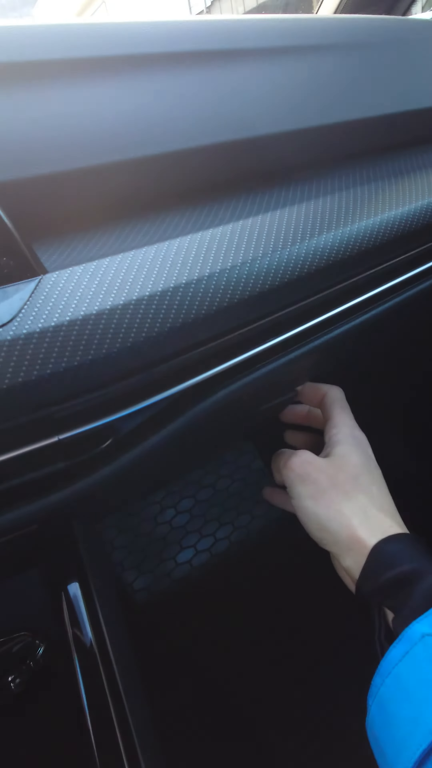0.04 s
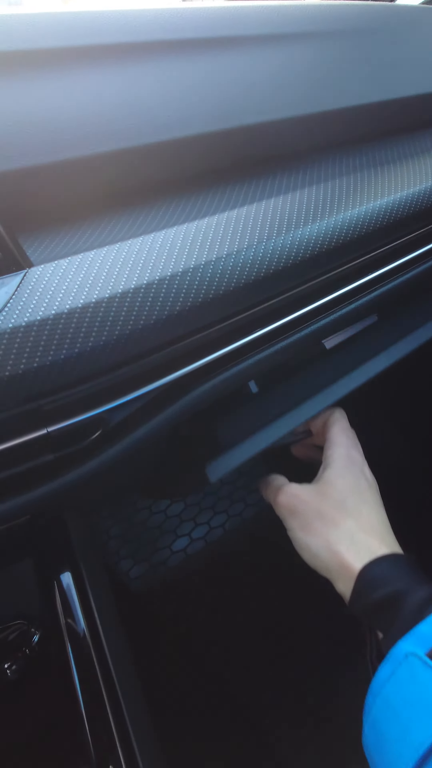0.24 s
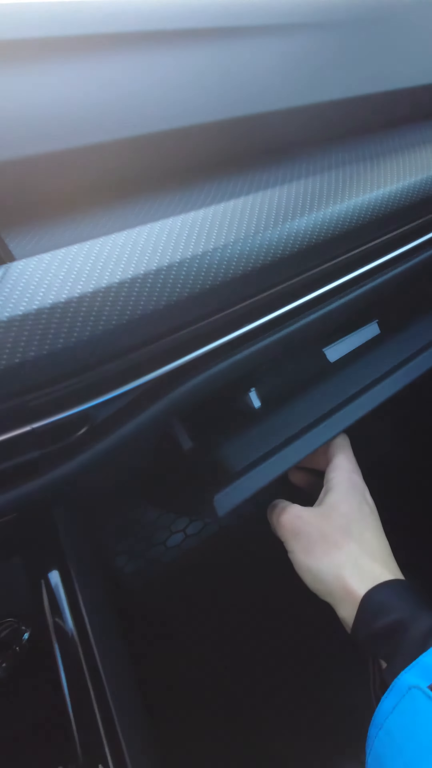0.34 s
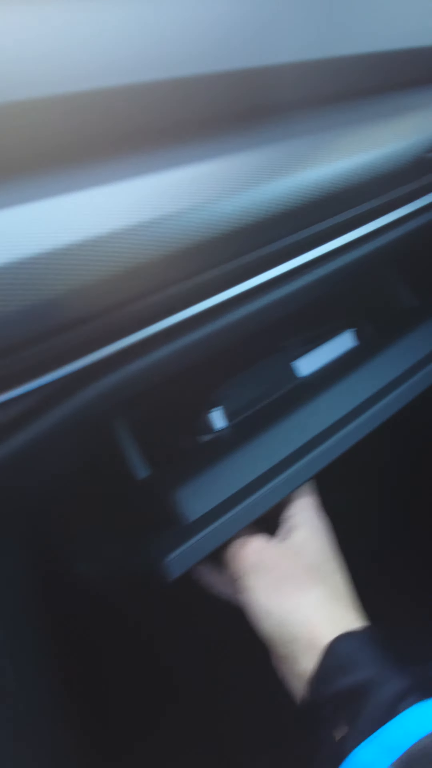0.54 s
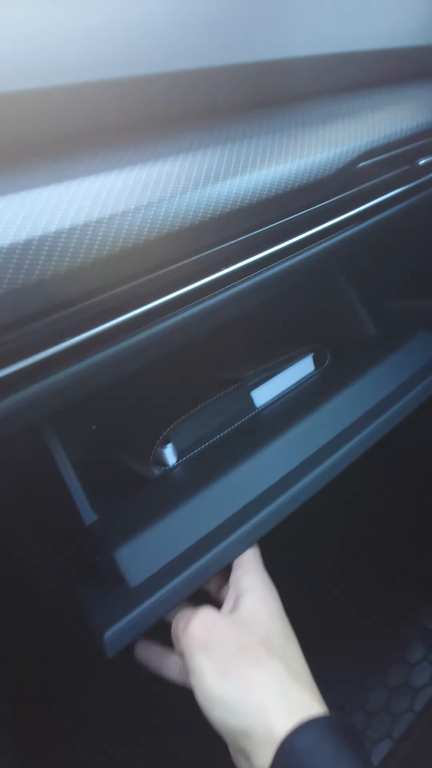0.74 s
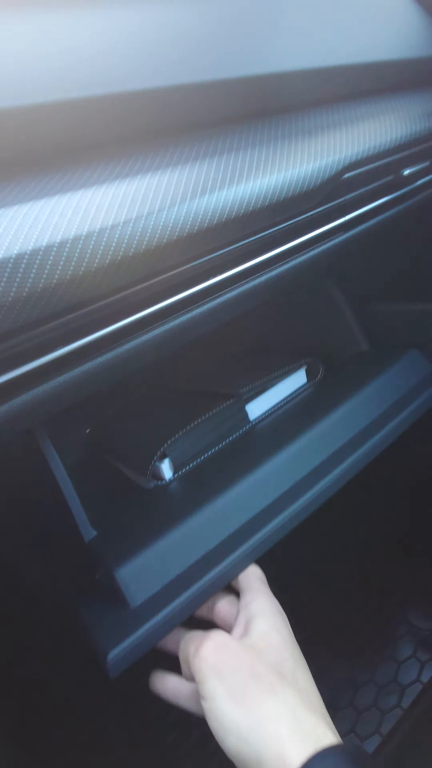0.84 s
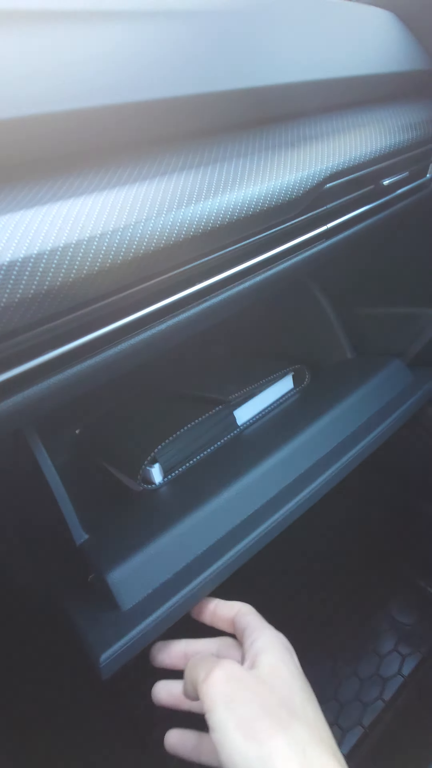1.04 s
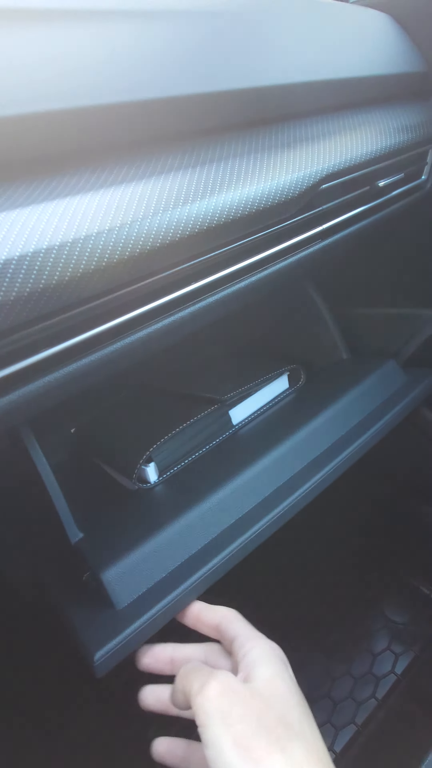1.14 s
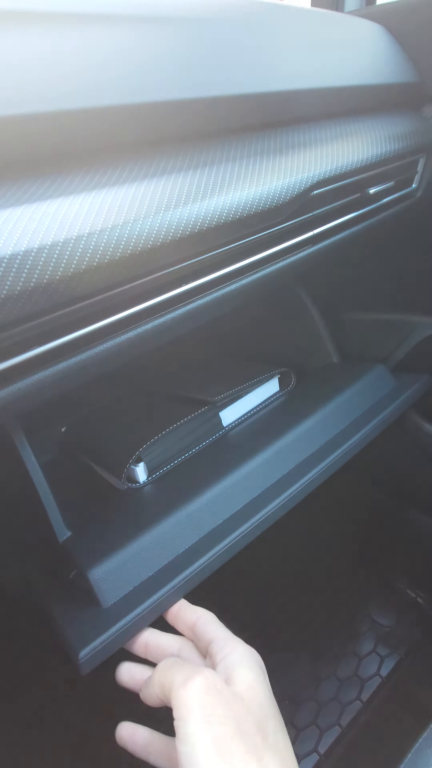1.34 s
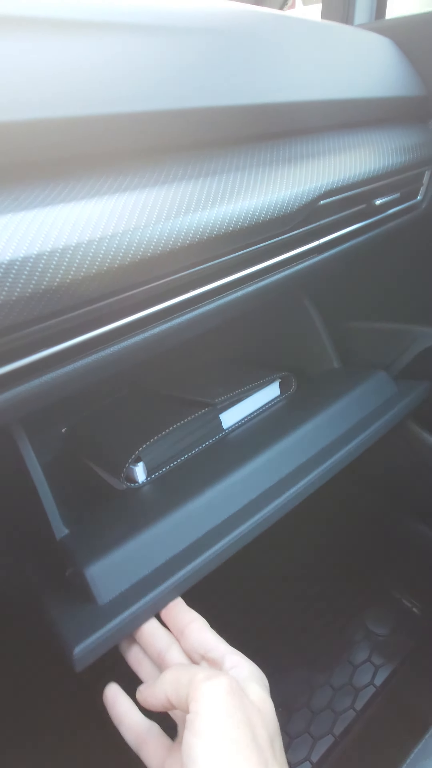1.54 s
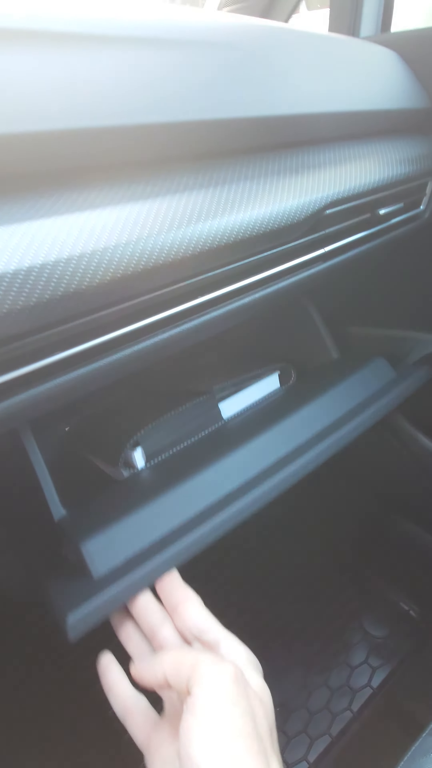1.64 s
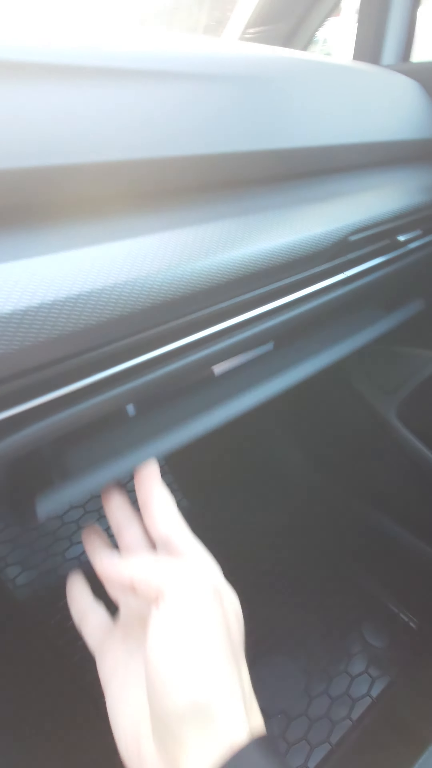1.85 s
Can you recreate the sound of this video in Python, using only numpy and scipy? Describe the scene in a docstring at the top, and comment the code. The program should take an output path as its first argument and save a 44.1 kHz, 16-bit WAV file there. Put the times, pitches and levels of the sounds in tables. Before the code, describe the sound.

A glovebox opens with a sharp plastic latch click and a low thump, close up inside a parked car. The lid slides down with a soft hiss, knocks on its stop, then creaks faintly as fingertips push it back.

```python
"""A glovebox in a parked car, heard up close on a hand-held stereo microphone.
A fingernail ticks on the handle; at 0.25 s the plastic latch clicks, its sprung bolt snaps free and
the dashboard booms in the small padded cabin. The lid slides down with a soft hiss, ticks on the way
and knocks on its stop at 1 s. From 1.6 s fingertips push it back up and the hinge groans.
Handling rumble, faint cabin air and a thin whine lie underneath throughout."""
import sys
import numpy as np
from scipy import signal
from scipy.fft import rfft, irfft, next_fast_len
from scipy.io import wavfile
from scipy.ndimage import map_coordinates

SR = 44100
rng = np.random.default_rng(int(sys.argv[2]) if len(sys.argv) > 2 else 0)


def output_pcm(signal):
    """Save a mono or channel-first signal as 16-bit PCM at the path in sys.argv[1].

    Samples are clipped to [-1, 1] before scaling.
    """
    pcm = np.clip(np.atleast_2d(signal).T, -1, 1) * 32767
    wavfile.write(sys.argv[1], SR, np.round(pcm).astype(np.int16))


N = 83790
T = np.arange(N) / SR


# clicks of the latch: start_s, panel_db, catch_db, crack_db, left_over_right_db
LATCH_CLICKS = [(.2175, -75, -52.5, -57, -8), (.2203, -51, -42, -50, -12.5), (.2232, -37, -31, -35.5, 1),
                (.2305, -37, -37, -42, -7), (.239, -52.5, -42.5, -55.5, -6.5),
                (.2515, -33, -35, -40, -10.5), (.2572, -24, -23.5, -34.5, 3),
                (.2635, -31.5, -33, -38.5, 4.5), (.268, -38, -39, -55, -7), (.274, -36, -48.5, -37, -9.5),
                (.282, -41.5, -49.5, -42.5, -5), (.298, -55, -49, -58.5, -6), (.314, -43, -38, -70, 5.5),
                (.322, -63, -39.5, -53.5, 4), (.3545, -53, -43, -62, 2.5)]
# fingers and hinge stops on the lid: start_s, panel_db, catch_db, crack_db, left_over_right_db
LID_KNOCKS = [(.008, -57.5, -50, -64.5, 1), (.033, -61, -51, -75, -5), (.073, -61, -50, -80, -5),
              (.6532, -42.5, -52, -41.5, -11), (.662, -63, -61, -52, -15), (.691, -49.5, -56, -58, -11),
              (.9635, -53, -77, -81, -8), (.980, -51, -67, -76, -13), (.999, -42, -47.5, -62.5, -3),
              (1.0055, -47, -50, -65, -2.5), (1.034, -64, -53.5, -71, -1)]
def contacts(rows, lead_s, contact_s):
    """Each contact knocks the panel, rings the catch and cracks; the left channel leads by lead_s."""
    out = np.zeros((2, N))
    for start_s, panel_db, catch_db, crack_db, balance_db in rows:
        blow = amp(panel_db) * panel(contact_s) + amp(catch_db) * catch()
        add(out, start_s, panned(blow, balance_db) + amp(crack_db) * crack())
    return filtered(out, lambda hz: np.exp(np.pi * 1j * hz * lead_s * np.array([[1], [-1]])))


# modes of the lid's panel: pitch_hz, level_db, t60_s
PANEL_MODES = [(240, -4, 0.055), (343, -3, 0.1), (427, 1, 0.08), (613, -4, 0.075), (824, -2, .055),
               (945, -3, .06), (1055, -10, 0.06), (1350, -7, 0.026)]
# noise of a knock on it: frequency_hz, level_db
KNOCK_SPECTRUM = [(100, -4), (300, -6), (800, 2.5), (1300, -5.5), (2200, -15), (4000, -21), (12000, -50)]
def panel(contact_s):
    """One knock on the lid's panel; a longer contact is softer."""
    tone = amp(-10.5) * ring(PANEL_MODES, rise_s=contact_s)
    knock = amp(-5.5) * burst(KNOCK_SPECTRUM, t60_s=0.046, rise_s=contact_s)
    return panned(tone + knock, balance_db=-0.5)


# modes of the catch: pitch_hz, level_db, t60_s
CATCH_MODES = [(1575, -9, .05), (1664, -13, .05), (1782, -8, .03), (1894, -6, .032), (2040, -12, .03)]
# its rattle: frequency_hz, level_db
RATTLE_SPECTRUM = [(600, -26.5), (1350, -7), (1600, 4), (2000, -3.5), (2450, -24.5), (3000, -14.5),
                   (3600, -30.5), (9000, -44)]
def catch():
    """The catch rattles in its seat."""
    tone = amp(-2.5) * ring(CATCH_MODES, rise_s=0.0018)
    rattle = amp(2) * burst(RATTLE_SPECTRUM, t60_s=0.017, rise_s=0.00064)
    return panned(tone + rattle, balance_db=-7)


# modes of the hollow handle: pitch_hz, level_db, t60_s
HANDLE_MODES = [(3630, -6.5, 0.044), (4170, -19, .06), (4540, -22, .05), (5380, -11.5, 0.042),
                (5460, -16.5, 0.058)]
# crack of hard plastic: frequency_hz, level_db
CRACK_SPECTRUM = [(500, -12), (2000, -4), (2500, 0.5), (3750, 0), (6300, -2.5), (7300, -6), (10500, -14),
                  (15500, -10)]
def crack():
    """The hard plastic gives a crack; each blow picks out different resonances of the handle."""
    spread_db = 3
    handle = sum(amp(spread_db * rng.standard_normal((2, 1))) * ring([mode], rise_s=0.00045)
                 for mode in HANDLE_MODES)
    plastic = amp(-1) * burst(CRACK_SPECTRUM, t60_s=0.045, rise_s=0.0019)
    return panned(plastic + handle, balance_db=-2.5)


# the bolt draws back, then snaps free: start_s, level_db, cutoff_hz
BOLT_STOPS = [(0.2229, -26, 2010), (0.2587, -17, 3900)]
# modes of the bolt: pitch_hz, level_db, t60_s
BOLT_MODES = [(1799, 3.5, 0.011), (1983, -10, 0.02), (2960, -8, 0.016)]
def bolt_snaps():
    """Right of the microphone, the sprung bolt rings at each end of travel; the gentler stop is duller."""
    out = np.zeros((2, N))
    for start_s, level_db, cutoff_hz in BOLT_STOPS:
        lowpass = signal.butter(8, cutoff_hz, fs=SR, output="sos")
        snap = signal.sosfilt(lowpass, ring(BOLT_MODES, rise_s=0.0015))
        add(out, start_s, panned(amp(level_db) * snap, balance_db=-12.5))
    return out


# shakes of the dashboard: start_s, level_db, rise_s
DASHBOARD_THUMPS = [(.003, -49.5, 0.01), (0.038, -53, 0.0039), (0.237, -24.5, 0.015),
                    (0.275, -29.5, 0.0039), (0.288, -36, 0.006), (.362, -44, 0.013), (1.042, -53.5, 0.007),
                    (1.098, -52, 0.022), (1.287, -55.5, 0.046)]
# modes of the dashboard and cabin air: pitch_hz, level_db, t60_s
BOOM_MODES = [(40, -7, 0.34), (50.2, -12.5, 0.63), (85.8, -17.5, 0.33), (109.9, 1.5, 0.18), (126, -15, .15)]
# thuds of the lid: start_s, level_db
LID_THUDS = [(0.2529, -41), (0.274, -32), (0.662, -34)]
# modes of its hollow body: pitch_hz, level_db, t60_s
HOLLOW_MODES = [(121, -6.5, 0.059), (269, -5.5, 0.067)]
def thumps():
    """The shaken dashboard and the cabin air boom; the hollow lid thuds."""
    out = np.zeros(N)
    for start_s, level_db, rise_s in DASHBOARD_THUMPS:
        add(out, start_s, amp(level_db) * ring(BOOM_MODES, rise_s, size=32768))
    for start_s, level_db in LID_THUDS:
        add(out, start_s, amp(level_db) * ring(HOLLOW_MODES, rise_s=0.011))
    return out


# fingertips push the lid back: start_s, panel_db, catch_db, left_over_right_db
FINGER_TAPS = [(1.597, -50, -54.5, -3.5), (1.616, -45.5, -65, -2), (1.661, -43, -61, 0.5),
               (1.821, -44, -77, 3), (1.835, -44, -74, 1)]
def finger_taps():
    """Soft fingertips knock the lid without a crack; the skin damps the treble."""
    skin_cutoff_hz = 2070
    out = np.zeros((2, N))
    for start_s, panel_db, catch_db, balance_db in FINGER_TAPS:
        tap = amp(panel_db) * panel(contact_s=0.0031) + amp(catch_db) * catch()
        add(out, start_s, panned(tap, balance_db))
    return signal.sosfilt(signal.butter(4, skin_cutoff_hz, fs=SR, output="sos"), out)


# the nail lands: start_s, level_db
NAIL_TICK = (.0402, -38)
# its tick: frequency_hz, level_db
NAIL_SPECTRUM = [(3000, -18), (7000, -7), (11000, -2.5), (13000, 6), (15500, -11)]
def fingernail():
    """A fingernail meets the handle with one thin, very bright tick."""
    start_s, level_db = NAIL_TICK
    out = np.zeros((2, N))
    add(out, start_s, amp(level_db) * burst(NAIL_SPECTRUM, t60_s=0.013, rise_s=0.0011))
    return out


# hiss of the lid going down, and back up: time_s, level_db
OPENING_LEVEL = [(0, -68), (.14, -72), (.2, -69), (.33, -64.5), (.46, -75.5), (.54, -61.5), (.62, -54.5),
                 (.7, -54), (.83, -59.5), (.93, -66), (1.03, -75), (1.2, -82), (1.35, -93)]
CLOSING_LEVEL = [(1.45, -110), (1.56, -86.5), (1.73, -80), (1.77, -60), (1.84, -58), (1.9, -57.5)]
# its colour each way: frequency_hz, level_db
OPENING_SPECTRUM = [(300, -10.5), (650, -6.5), (900, 4), (1200, -3.5), (1700, -2), (2700, 1.5),
                    (4200, -5.5), (6000, -0.5), (7400, -1.5), (10500, -7), (15500, -7)]
CLOSING_SPECTRUM = [(900, 3.5), (2300, -15.5), (3600, 1), (4500, -11), (6000, -1.5), (7500, 2.5),
                    (10500, -8.5), (15000, -11.5)]
def lid_slide():
    """The lid hisses as it slides, a little right of the microphone."""
    flutter = amp(0.54 * wobble(37))
    opening = level(OPENING_LEVEL) * noise(OPENING_SPECTRUM)
    closing = level(CLOSING_LEVEL) * noise(CLOSING_SPECTRUM)
    return panned(flutter * (opening + closing), balance_db=-4)


# friction in the hinge: time_s, level_db
RUB_LEVEL = [(0, -60.5), (.09, -69), (.13, -68), (.21, -70.5), (.3, -60), (.48, -67.5), (.7, -65.5),
             (.97, -64.5), (1.1, -71), (1.25, -81), (1.58, -76.5), (1.66, -65.5), (1.76, -60),
             (1.85, -60.5), (1.9, -60)]
# its colour: frequency_hz, level_db
RUB_SPECTRUM = [(130, -2.5), (230, -23), (290, -7.5), (360, 3), (450, -5), (540, -7.5), (700, -2),
                (930, 0.5), (1200, -10), (1750, -3.5), (2300, -12.5), (5000, -34)]
def hinge_rub():
    """The hinge rubs unevenly as it turns."""
    roughness = amp(1.8 * wobble(110))
    return panned(level(RUB_LEVEL) * roughness * noise(RUB_SPECTRUM), balance_db=-6)


# swells of the groan: peak_s, half_width_s, level_db
GROAN_SWELLS = [(1.751, 0.015, -53), (1.777, 0.013, -50), (1.836, 0.0067, -53.5)]
def hinge_groan():
    """Pushed back, the hinge groans on a rough, slightly rising note."""
    base_hz, climb_hz_per_s, jitter = 344.8, 130, 0.033
    swell = sum(amp(level_db) * np.exp(-((T - peak_s) / half_width_s) ** 2)
                for peak_s, half_width_s, level_db in GROAN_SWELLS)
    since_first_peak_s = T - GROAN_SWELLS[0][0]
    pitch_hz = (base_hz + climb_hz_per_s * since_first_peak_s) * (1 + jitter * wobble(200))
    roughness = amp(2.5 * wobble(260))
    tone = np.sin(2 * np.pi * np.cumsum(pitch_hz) / SR)
    return panned(swell * roughness * tone, balance_db=-2.5)


# decay of the cabin: frequency_hz, t60_s
CABIN_DECAY = [(100, 0.16), (500, 0.14), (2000, 0.076), (8000, 0.1)]
def cabin_reverb(x):
    """The short tail of the padded cabin, reaching the microphone 3 ms after the direct sound."""
    white = noise([(20, 0), (20000, 0)], size=16384)
    hz, t, spectrogram = signal.stft(white, SR, nperseg=256)
    decay = amp(-60 * t / along(CABIN_DECAY, hz)[:, None])
    tail = signal.istft(spectrogram * decay, SR, nperseg=256)[1]
    delayed_tail = np.pad(tail / np.linalg.norm(tail[0]), ((0, 0), (128, 0)))
    return signal.fftconvolve(x, delayed_tail, axes=1)[:, :N]


# handling of the microphone: time_s, level_db
HANDLING_LEVEL = [(0, -66), (.2, -65), (.33, -35.5), (.45, -54.5), (.62, -57), (.7, -63.5), (.97, -58),
                  (1.06, -48.5), (1.2, -59.5), (1.33, -54.5), (1.42, -61.5), (1.6, -60), (1.9, -76)]
# its rumble: frequency_hz, level_db
RUMBLE_SPECTRUM = [(10, 10), (25, -4.5), (42, 10.5), (65, -11), (85, -2.5), (135, -14.5), (190, -31.5),
                   (500, -58.5)]
def handling_rumble():
    """The microphone rumbles in the hand, most just after the latch opens."""
    return level(HANDLING_LEVEL) * noise(RUMBLE_SPECTRUM)


# room tone of the car: frequency_hz, level_db
AIR_SPECTRUM = [(50, 10), (200, -10.5), (350, 1), (600, 0), (860, 13), (1150, -14), (1800, -8),
                (2500, -29.5), (4300, -28.5), (5900, -14.5), (8000, -21), (15500, -44)]
def cabin_air():
    """The faint, steady air of the parked car."""
    return amp(-74.5) * noise(AIR_SPECTRUM)


# course of the whine: time_s, level_db
WHINE_LEVEL = [(0, -77.5), (.9, -72), (1.3, -92.5), (1.75, -88)]
def whine():
    """A thin band of noise high in the treble swells a little, then fades."""
    centre_hz, half_width_hz = 6264, 140
    white = rng.standard_normal((2, N))
    band = filtered(white, lambda hz: 1 / (1 + ((hz - centre_hz) / half_width_hz) ** 4))
    return level(WHINE_LEVEL) * unit(band)


# likeness of left and right at the microphone: frequency_hz, correlation
STEREO_LIKENESS = [(40, 0.94), (140, 0.92), (300, 0.77), (600, 0.3), (1200, 0.035), (4000, 0.029)]
def noise(spectrum, size=N):
    """Coloured stereo noise of rms 1, near mono in the bass."""
    def mid_side_gains(hz):
        angle = np.arccos(np.clip(along(STEREO_LIKENESS, hz), -1, 1)) / 2
        return amp(along(spectrum, hz)) * [np.cos(angle), np.sin(angle)]
    mid, side = filtered(rng.standard_normal((2, size)), mid_side_gains)
    return unit(np.array([mid + side, mid - side]))


def burst(spectrum, t60_s, rise_s):
    """A short dying puff of noise."""
    return noise(spectrum, size=8192) * fade(T[:8192], t60_s, rise_s)


def ring(modes, rise_s, size=8192):
    """Damped modes, struck a little differently each time."""
    t = T[:size]
    return sum(amp(db + rng.standard_normal()) * np.sin(2 * np.pi * hz * t) * fade(t, t60_s, rise_s)
               for hz, db, t60_s in modes)


def fade(t, t60_s, rise_s):
    """A quick rise and an exponential decay."""
    return np.exp(-np.log(1000) * t / t60_s) * (1 - np.exp(-t / rise_s))


def amp(db):
    """Decibels to gain."""
    return 10 ** (np.asarray(db) / 20)


def unit(x):
    """Scale to rms 1."""
    return x / np.sqrt(np.mean(x ** 2) + 1e-20)


def along(points, hz):
    """Interpolate (frequency_hz, value) points on a log axis."""
    point_hz, values = np.transpose(points)
    return np.interp(np.log(hz + 1), np.log(point_hz + 1), values)


def level(points):
    """Gain per sample from (time_s, level_db) points."""
    return amp(np.interp(T, *np.transpose(points)))


def wobble(knots_per_s):
    """A smooth random curve."""
    return map_coordinates(rng.standard_normal(int(N * knots_per_s / SR) + 4), [T * knots_per_s])


def filtered(x, response):
    """Filter x by a gain that is a function of frequency."""
    size = x.shape[-1]
    padded = next_fast_len(size + 4096)
    return irfft(rfft(x, padded) * response(np.fft.rfftfreq(padded, 1 / SR)), padded)[..., :size]


def add(out, start_s, x):
    """Mix x into out at start_s."""
    i = max(0, round(start_s * SR))
    out[..., i:i + x.shape[-1]] += x[..., :N - i]


def panned(x, balance_db):
    """Lean a sound to the left by balance_db; negative leans right."""
    return x * amp([[balance_db / 2], [-balance_db / 2]])


def scene():
    """All sources as they reach the microphone; the blows also ring in the cabin."""
    latch = contacts(LATCH_CLICKS, lead_s=0.00012, contact_s=0.00063) + bolt_snaps()
    knocks = contacts(LID_KNOCKS, lead_s=0.00008, contact_s=0.00092)
    blows = latch + knocks + finger_taps()
    impacts = blows + amp(-9) * cabin_reverb(blows) + fingernail() + thumps()
    moving_lid = lid_slide() + hinge_rub() + hinge_groan()
    return impacts + moving_lid + handling_rumble() + cabin_air() + whine()


def record(dry):
    """The microphone has a deep notch near 9 kHz and a band limit."""
    notch = [(7700, 0.0), (8400, -20), (9500, -14.5), (10500, -3)]  # frequency_hz, gain_db
    band_limit_hz = 15830
    return filtered(dry, lambda hz: amp(along(notch, hz)) * (hz < band_limit_hz))


dry = scene()
out = record(dry)
output_pcm(out)
```